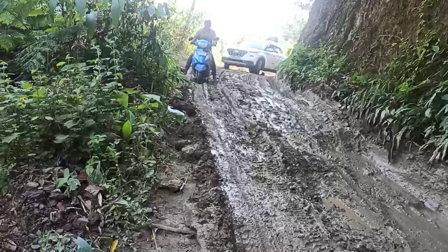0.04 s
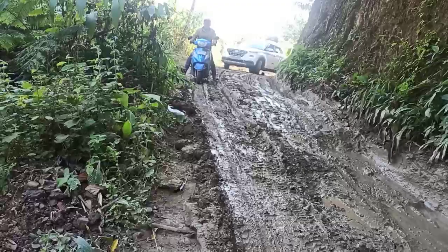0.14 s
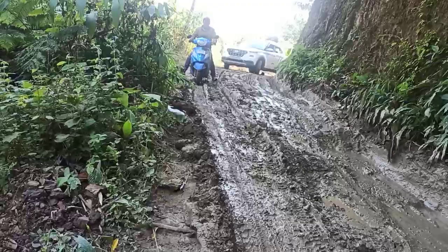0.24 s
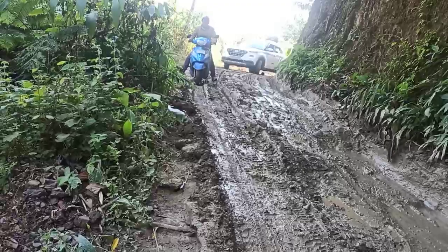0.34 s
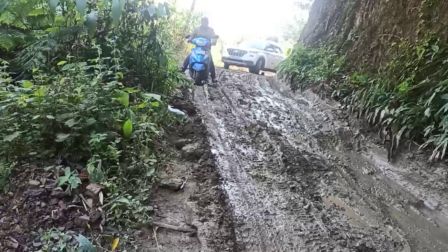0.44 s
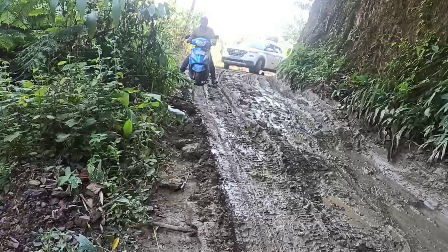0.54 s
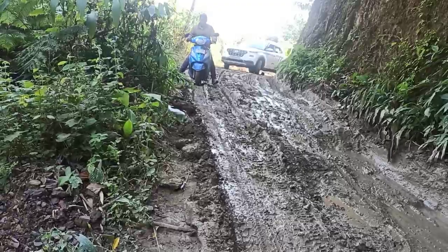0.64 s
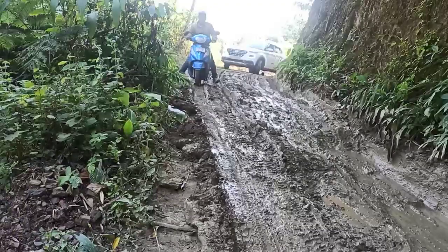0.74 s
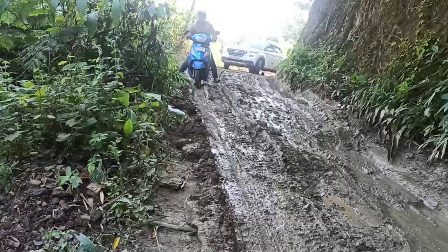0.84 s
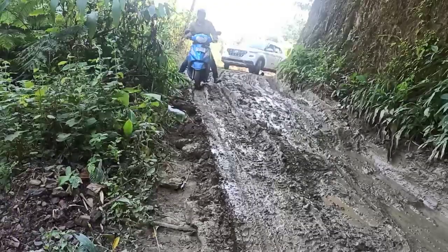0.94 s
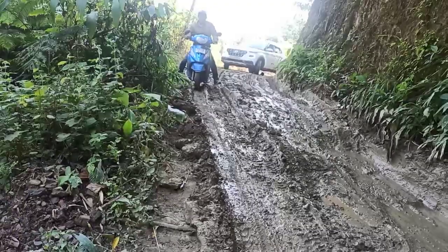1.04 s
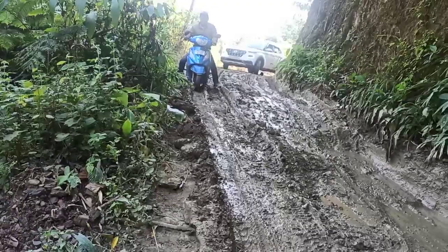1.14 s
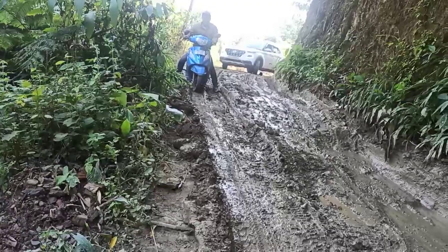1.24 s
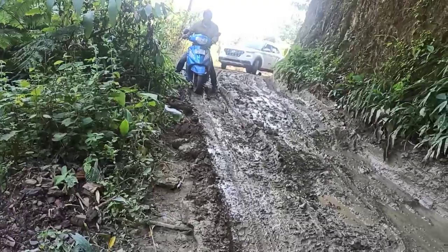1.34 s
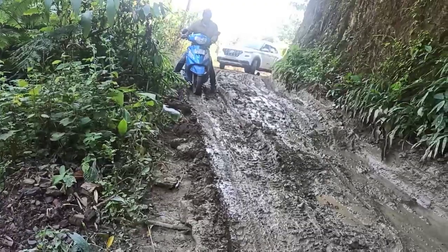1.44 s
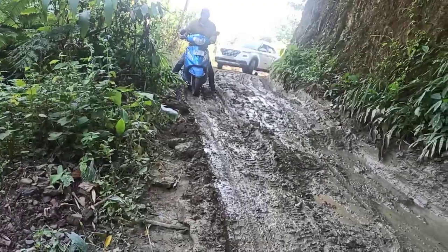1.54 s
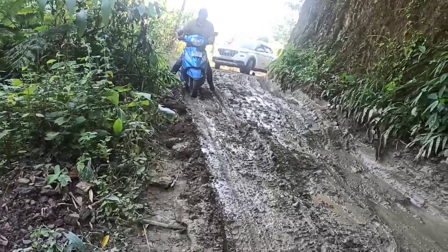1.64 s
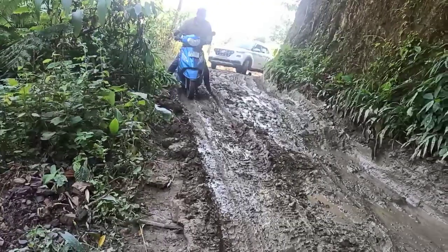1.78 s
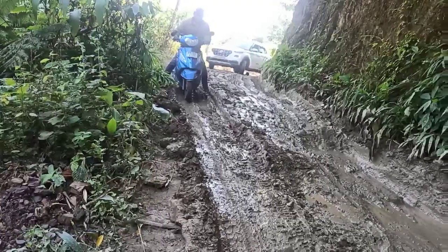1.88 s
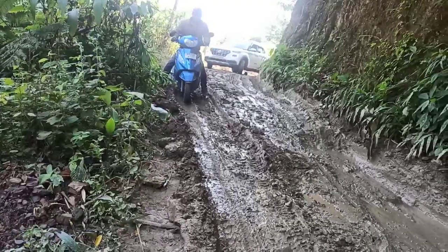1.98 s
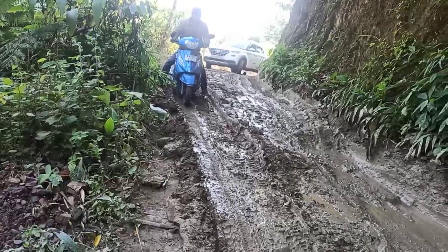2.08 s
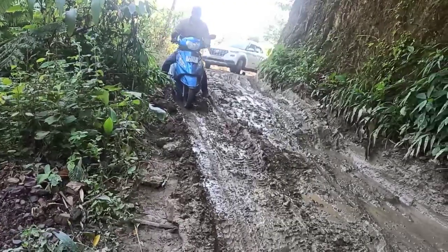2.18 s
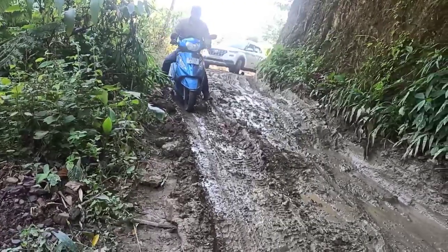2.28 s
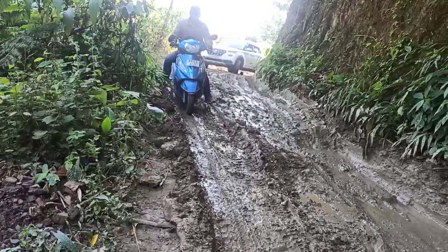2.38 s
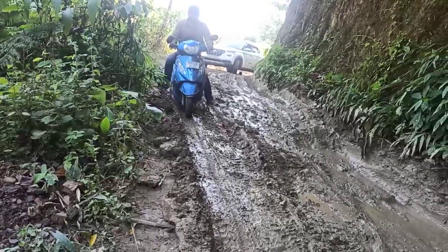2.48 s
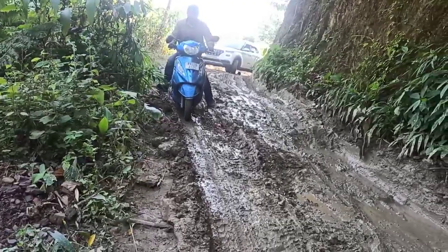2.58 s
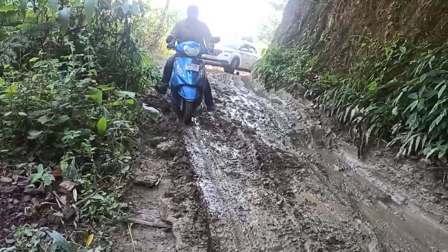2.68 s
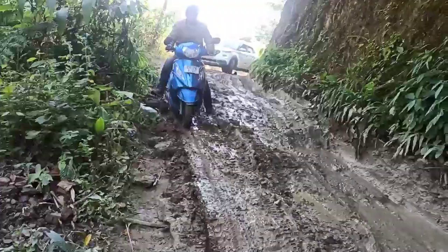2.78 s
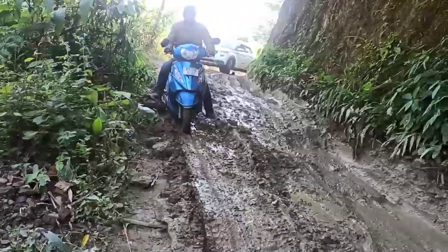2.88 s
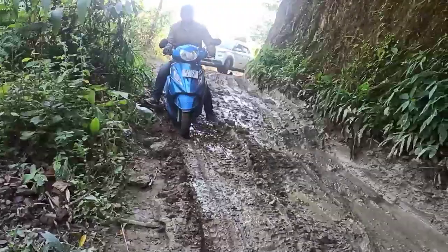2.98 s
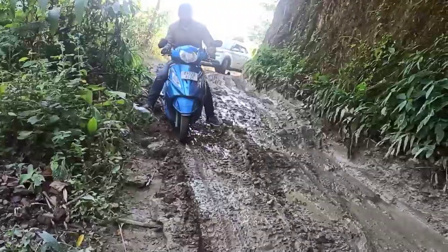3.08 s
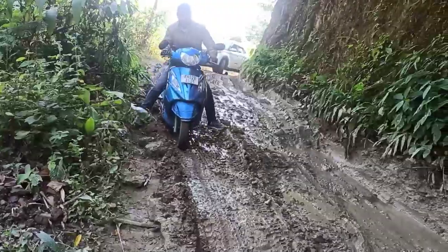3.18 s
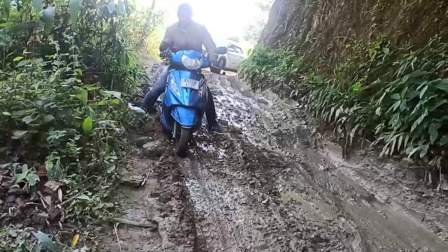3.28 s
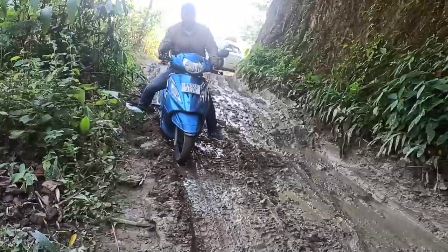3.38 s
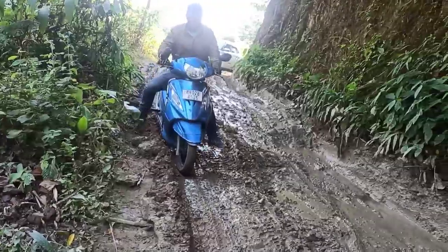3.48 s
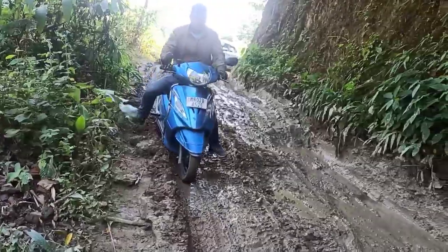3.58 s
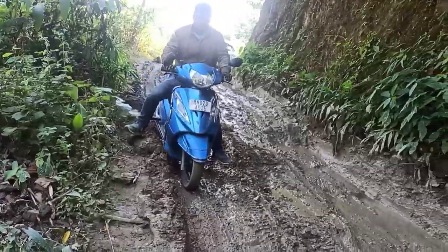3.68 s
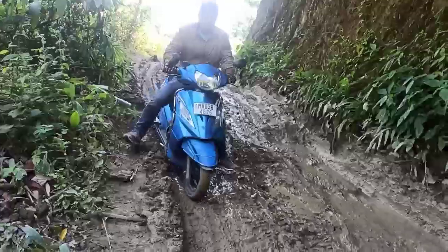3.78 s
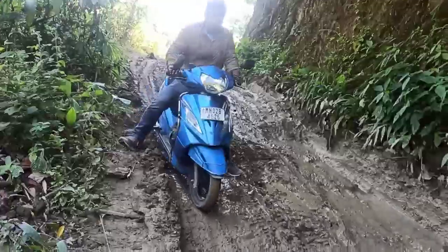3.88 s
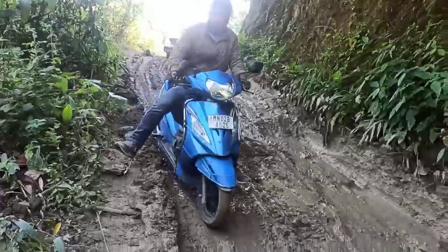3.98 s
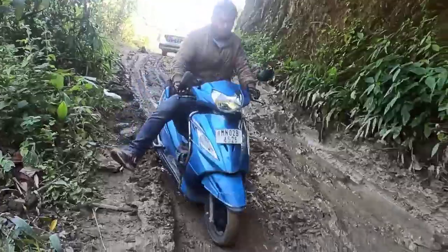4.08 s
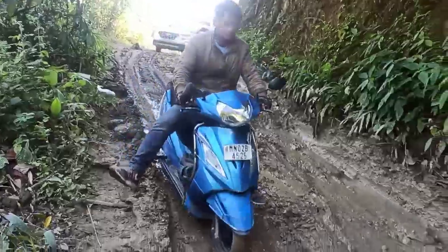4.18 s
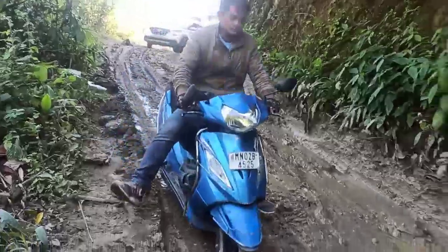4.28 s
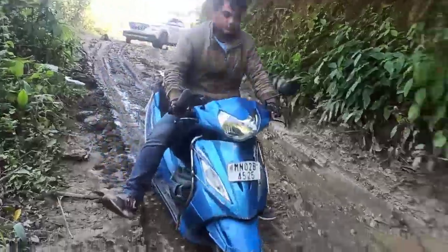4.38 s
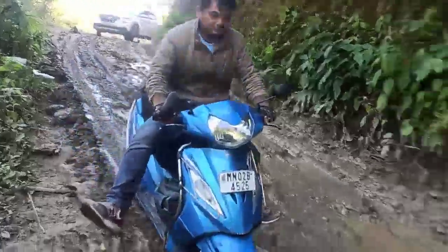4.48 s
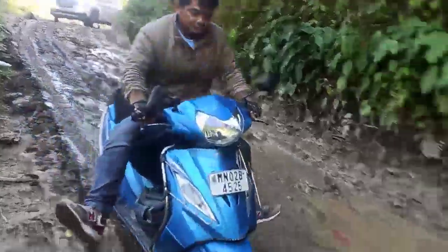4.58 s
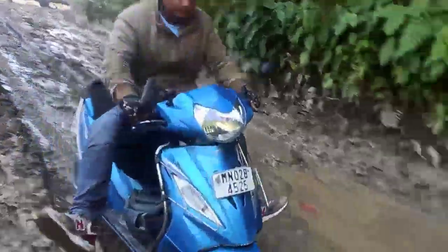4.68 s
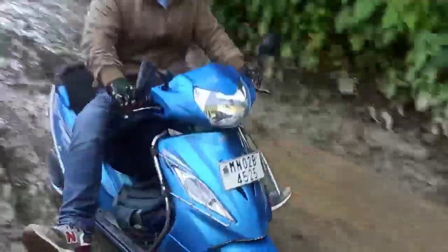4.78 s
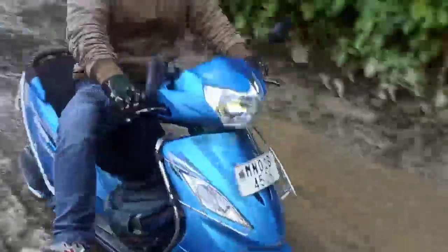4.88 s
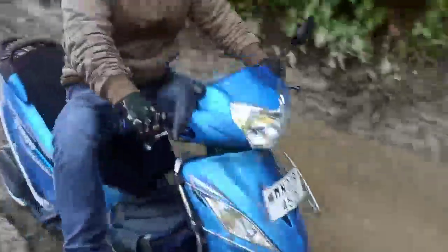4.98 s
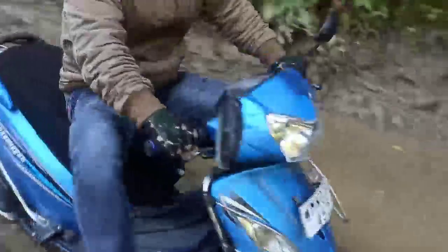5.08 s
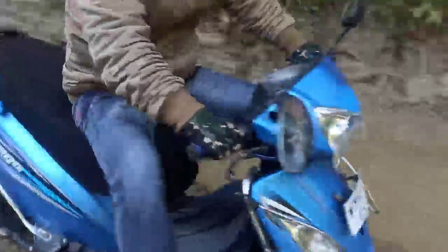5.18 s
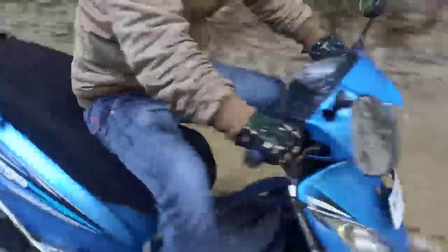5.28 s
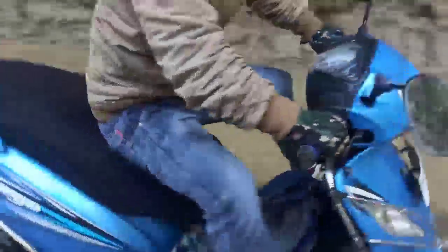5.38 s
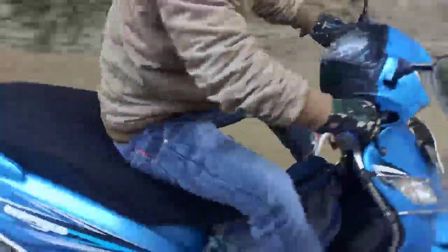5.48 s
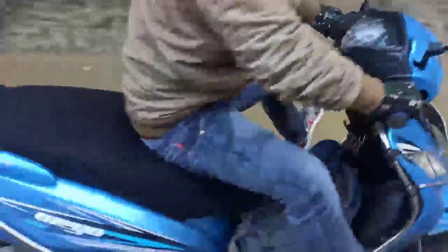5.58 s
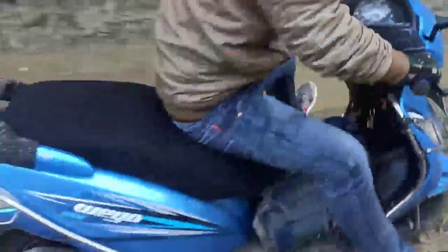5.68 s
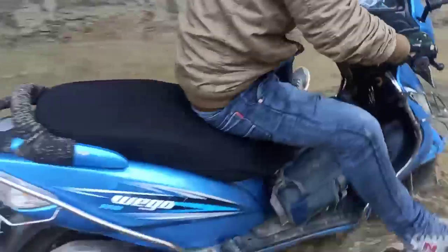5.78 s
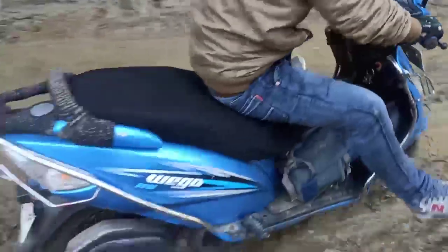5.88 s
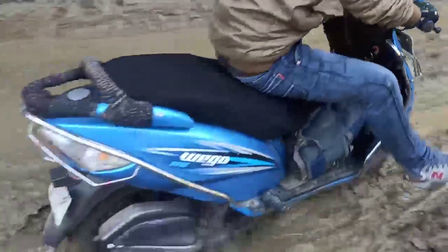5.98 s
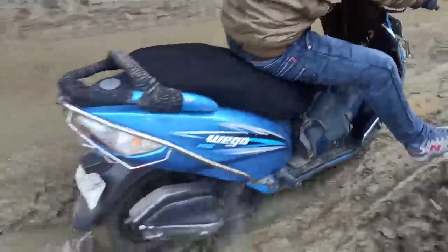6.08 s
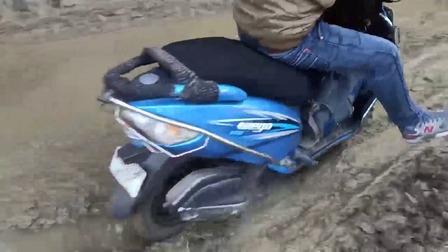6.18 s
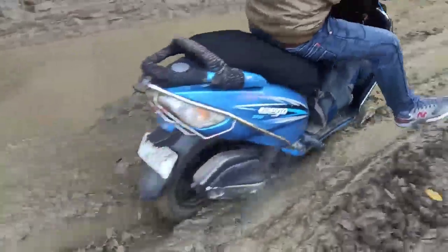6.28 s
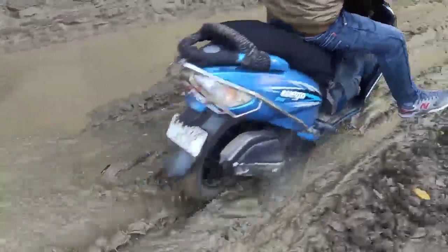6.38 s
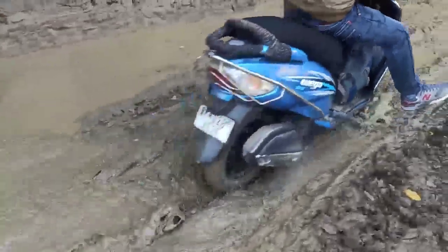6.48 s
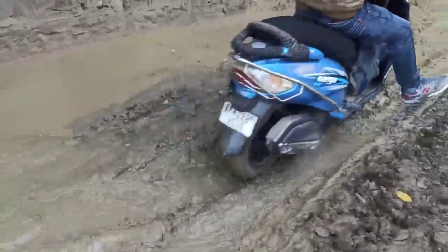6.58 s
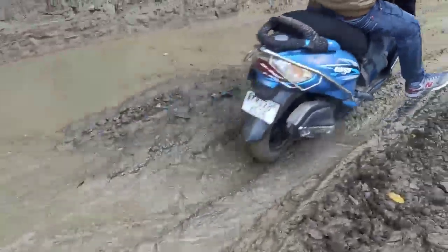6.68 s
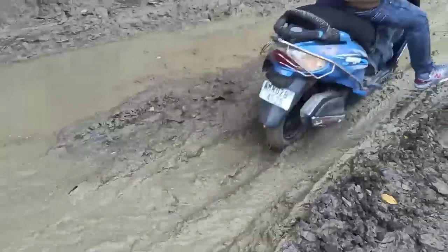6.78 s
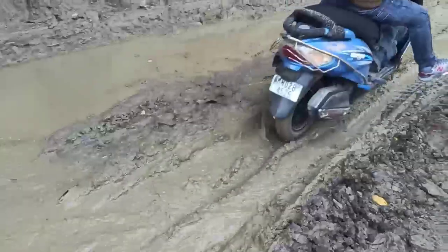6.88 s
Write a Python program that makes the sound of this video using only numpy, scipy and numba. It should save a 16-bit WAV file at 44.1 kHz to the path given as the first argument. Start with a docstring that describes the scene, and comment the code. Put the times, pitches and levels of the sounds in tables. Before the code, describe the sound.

A small scooter engine putters closer along a muddy track and passes close by, its tyres squelching and splattering through wet mud.

```python
"""A muddy forest track: a single-cylinder four-stroke scooter paddles slowly along, close past a phone.
Each firing excites the resonances of the silencer, and an earth bank reflects the thumps.
Belt, fan and valve gear give broadband noise and drive the modes of the engine case.
Tyres and boots tear wet mud, which hisses, squelches and splats; air pockets in it pop and suck shut."""
import sys
import numpy as np
from scipy import signal
from scipy.fft import rfft, irfft, next_fast_len
from scipy.io import wavfile
from scipy.ndimage import uniform_filter1d
from numba import njit

SR = 44100
rng = np.random.default_rng(int(sys.argv[2]) if len(sys.argv) > 2 else 0)


def unload_audio(sound):
    """Save the sound as a 16-bit wav file, at the path given as the first command line argument."""
    columns = np.transpose(np.atleast_2d(sound))
    # keep every value between -1 and 1, then stretch to whole-number steps
    steps = np.round(np.clip(columns, -1, 1) * 32767)
    wavfile.write(sys.argv[1], SR, steps.astype(np.int16))


N = 306054

# engine speed: time_s, firing_rate_hz
FIRING_RATE = [(0.0, 18.94), (0.091, 23.55), (0.687, 15.76), (0.965, 15.88), (1.337, 24.07), (1.913, 26.47),
               (2.414, 22.93), (2.742, 17.99), (3.166, 17.8), (3.782, 12.98), (3.885, 14.69),
               (4.208, 13.43), (4.737, 25.14), (5.059, 20.22), (5.356, 16.22), (5.704, 15.96),
               (6.033, 23.67), (6.567, 24.95), (6.722, 22.31), (6.94, 23.82)]
# twists of the throttle: opens_s, shuts_s, opening (0 to 1)
THROTTLE_TWISTS = [(-.3, .3, 0.39), (0.95, 2.31, 0.87), (3.045, 3.407, 0.45), (4.18, 4.774, 0.99),
                   (5.586, 7.2, 0.84)]
# silencer chambers (boom, purr, bark, rasp): pitch_hz, width_hz, shut_delay_ms, open_delay_ms
CHAMBER_MODES = [(94.2, 51, 4.76, 8.2), (142.9, 71.6, 3.25, 5.94), (210.5, 49, 6.3, 3.43),
                 (300.3, 47, 5.97, 3.55)]
# gain of the same chambers at the two ends of the throttle: shut_db, open_db
CHAMBER_GAINS = [(-3, -9), (-11, 1), (-6.5, -3.5), (-18.5, -15.5)]
# exhaust level, with extra gain for some chambers: time_s, level_db, boom_db, bark_and_rasp_db
EXHAUST_LEVELS = [(0, -44, 0, 4), (.33, -47, 3, 1), (.89, -46.5, -6, 0.5), (1.1, -38.5, -13, 1),
                  (1.35, -43.5, -6, 7), (1.6, -43, 3, 7), (1.95, -40.5, -4, 2.5), (2.03, -39, -4, 7.5),
                  (2.15, -41, -4, 8), (2.3, -41.5, 3, 7.5), (2.43, -37.5, 0, -5), (2.68, -41.5, -2.5, 2),
                  (2.9, -41.5, -2, 3), (3.25, -39, 1.5, 4.5), (3.4, -45, 9, 5), (3.47, -46.5, 1, 0),
                  (3.53, -36, -3, 0.5), (3.6, -45, 1, 2), (3.67, -40, -5, 1), (3.82, -44.5, 0, 7),
                  (3.98, -42.5, 1.5, 3), (4.12, -39.5, 0.5, 5), (4.27, -37, -2, 2), (4.4, -36, 3.5, 5.5),
                  (4.63, -30.5, 2, 3), (4.79, -33, 1, 4.5), (4.85, -27.5, 3.5, -2.5), (5.0, -27, -2, 1.5),
                  (5.11, -35, 6, -1.5), (5.17, -30.5, 2, -1), (5.22, -34, 2, 1), (5.28, -33.5, 3, 3.5),
                  (5.33, -37, 3, 3), (5.4, -34, -0.5, -2.5), (5.68, -25, -0.5, -3.5), (5.85, -28, 3, -4),
                  (5.96, -23, -5, -4), (6.12, -26, 2, -0.5), (6.25, -24.5, 3, 0), (6.6, -25, 5, -0.5),
                  (6.7, -27, 0, -0.5), (6.86, -25, 0.5, -1), (6.94, -26.5, -4, 1.5)]
# reflections from the earth bank: delay_s, gain_db
BANK_REFLECTIONS = [(.0075, -7.5), (.021, -17), (.034, -17)]

# drive level, with two parts relative to it: time_s, whirr_db, growl_db, whine_db
DRIVE_LEVELS = [(0, -49.5, -0.5, -4), (.17, -46.5, -0.5, -4), (.35, -48, 0.5, -10), (.9, -52, 3, -17),
                (1.1, -48, 2, -17), (1.5, -45.5, 0.5, -2), (1.9, -45.5, 6.5, -0.5),
                (2.24, -43.5, 2.5, -3.5), (2.55, -47, 4, -2.5), (3.23, -45, -1.5, -18),
                (3.55, -45.5, 4, -18), (3.9, -47, 4, -18), (4.22, -43, 0, -5), (4.33, -39, -1.5, -16),
                (4.45, -38, -6, -13), (4.6, -36.5, -4.5, -18), (4.75, -32.5, -7.5, -14),
                (4.88, -34, -1.5, -9), (5.1, -35, 0.5, -1), (5.3, -31.5, 1, -14), (5.5, -30.5, 1.5, -16),
                (5.7, -29, -0.5, -10), (5.85, -25.5, 2.5, -24), (6.01, -23.5, -2, -10),
                (6.15, -24.5, -6, -4), (6.3, -26.5, -7.5, -12), (6.5, -29, 0.5, 1), (6.62, -30, -1.5, -3),
                (6.75, -30.5, -5.5, -2.5), (6.85, -32, 1, -3), (6.94, -35.5, -4, -4)]
# noise spectra of the drive: frequency_hz, density_db
WHIRR_SPECTRUM = [(260, -32), (450, -0.5), (564, 1), (916, 3.5), (992, 0), (1100, 0.5), (1300, -1),
                  (1500, -0.5), (1950, -25), (3300, -120)]
GROWL_SPECTRUM = [(60, -14), (130, -5.5), (210, -4.5), (290, -1), (450, -2)]
# modes of engine case, belt drive, silencer shell and valve gear: pitch_hz, width_hz, level_db
CASE_MODES = [(518, 32, 6.5), (621, 21, 1), (686, 25, 3), (924, 48, 0.5), (1510, 110, -18.5)]
WHINE_MODES = [(1236, 18, 0.5), (1278, 20, 3), (1341, 16, 0.5), (1532, 34, -3), (1750, 26, -6), ]
SHELL_MODES = [(1141, 49, 0)]
VALVE_MODES = [(2096, 35, 4), (2530, 47, -4.5), (2946, 40, -4.5), (3080, 39, -3), (3760, 44, -4),
               (4530, 40, -5)]
# case ring as the scooter shows front, side and tail: time_s, over_whirr_db, tilt_db_per_octave
CASE_LEVELS = [(0, -9, 1), (.7, 0.5, -1), (1.8, -5.5, -11), (2.6, -4.5, -0.5), (3.2, -1.5, -6.5),
               (4.1, -2, 13), (4.6, -4.5, 14), (5.3, -7.5, -2), (5.9, -10, 9), (6.3, -6.5, 11.5),
               (6.94, -13, 9)]
# shell ring, strongest as the tail turns to the phone: time_s, over_whirr_db
SHELL_LEVELS = [(0, -13), (1.4, -14), (1.9, -6), (2.3, -5), (2.6, -16), (4.7, -10), (5.05, -7), (5.3, -19),
                (5.78, -9), (5.9, -15), (6.35, -16), (6.45, -3), (6.6, 2), (6.72, -5), (6.82, 1),
                (6.94, 5.5)]

# mud under the tyres, with two parts relative to the hiss: time_s, hiss_db, squelch_db, spray_db
MUD_LEVELS = [(0, -51.5, -4.5, -10), (.68, -48, -7, -9), (.9, -50.5, -6.5, -10), (1.3, -49.5, -0.5, -9),
              (2.3, -44.5, -2, -8), (2.76, -44, -4.5, -5), (3.15, -47, -4.5, -5), (3.56, -45.5, -2, -6.5),
              (3.7, -44, -10, -6), (3.85, -40.5, -11, -6), (4.05, -41, -6.5, -6), (4.5, -33.5, -5, -7),
              (4.9, -34, -2.5, -9), (5.1, -30.5, -14, -8), (5.45, -29.5, -0.5, -8.5),
              (5.58, -25.5, -4.5, -6.5), (5.68, -25.5, -3, -7), (5.79, -23.5, -4, -7),
              (5.88, -24, -1, -7.5), (6.0, -27.5, 0.5, -6.5), (6.25, -29, 2, -9), (6.5, -31.5, 2.5, -6.5),
              (6.7, -31.5, -2.5, -9.5), (6.94, -37, 3.5, -10.5)]
# noise spectrum of tearing mud: frequency_hz, density_db
HISS_SPECTRUM = [(2200, -22), (2900, -10.5), (3400, -5), (4400, -5), (4700, -5), (5000, -8), (5900, -8),
                 (6400, 0.5), (7000, -1), (7600, -1.5), (8600, -6)]
# boots and tread in deeper mud: start_s, over_hiss_db, power_decay_s, squelch_over_slosh_db
MUD_SLOSHES = [(.8, 6, 0.016, -13), (2.71, -1, 0.021, 3.5), (2.92, -0.5, 0.059, -17), (3.22, 3, 0.16, -7),
               (3.575, 5, 0.023, 4.5), (3.648, 1.5, 0.031, 4), (3.718, 11, 0.03, -3.5),
               (3.93, -9, 0.025, -1), (4.06, 2, .03, -5), (4.095, 12, 0.033, -8.5), (4.19, -4, 0.048, -5),
               (4.34, -4, 0.056, 4.5), (4.49, -12, 0.032, -11), (4.56, 5, 0.044, -3),
               (4.647, 8.5, 0.023, -3.5), (4.809, 6.5, 0.019, -3), (4.912, 6.5, 0.049, -3),
               (5.055, -4, 0.025, 3.5), (5.115, -1, 0.19, -1), (5.385, 1.5, 0.098, -14),
               (5.999, 8, 0.016, -3), (6.085, -2.5, 0.13, 3.5), (6.539, 1, 0.068, 5),
               (6.695, 4.5, 0.0068, 7)]
# mud landing: start_s, level_db, brightness_db, body_db, left_minus_right_db
MUD_SPLATS = [(0.3217, -45, 2, -10, 1), (2.5057, -35, -11, 3, -4), (2.6256, -37, -24, 4.5, -6),
              (2.7143, -34, -2, -12, -2), (2.737, -36, -20, -3, 0), (3.338, -34, -8, -5, 1),
              (3.578, -39, 8, 9, -3), (3.651, -40, 5, 4, -6), (3.682, -36, -12, 6, 0),
              (3.7183, -24, -1, -2.5, 4), (3.743, -30, -10, 4, -2), (3.814, -32, -20, -3, 7),
              (3.8828, -27, -31, -14, 0.5), (3.93, -28, -24, -12, 0), (3.9342, -19.5, -24, -14, 1),
              (4.0294, -20, -28, -14, 1), (4.101, -21, -19, -14, -1), (4.116, -21, -21, -8, -6),
              (4.1926, -24, -6, -6, -2), (4.306, -22, -29, -10, 5), (4.355, -20, -29, -18, -1),
              (4.401, -19, -27, -12, 0), (4.645, -17, -35, -11, 2), (4.778, -24, -42, -2, -4),
              (4.911, -12.5, -30, -12, -2), (5.06, -14, -23, -18, 2), (5.121, -15.5, -15, -18, -1),
              (5.328, -24, -14, -3, 4), (5.387, -19, -18, -16, -3), (5.502, -23, -25, 5, -7),
              (6.351, -18, -26, -4, -2), (6.543, -35, -16, -13, -2), (6.7014, -31, -34, -4, -2)]
# air pockets opening: start_s, level_db, pitch_hz
AIR_POCKETS = [(3.577, -40, 2180), (4.309, -34, 1070), (4.339, -27.5, 614), (4.354, -24, 1630),
               (4.418, -24.5, 730), (4.82, -24, 1130), (4.912, -19, 1500), (4.969, -24, 795),
               (5.327, -15.5, 806), (5.336, -20, 680), (5.329, -15, 1290), (5.357, -24.5, 850),
               (5.501, -19, 1460), (5.514, -18.5, 704), (5.79, -17, 1064), (5.829, -17, 1470),
               (6.069, -19, 820), (6.39, -20, 660)]
# hollows sucking shut: start_s, duration_s, level_db, from_hz, to_hz
MUD_HOLLOWS = [(6.016, 0.068, -25, 1500, 797)]

# stereo balance of drive and mud: time_s, left_minus_right_db
BALANCE = [(0.0, 2), (4.06, 1.5), (5.45, 1), (6.94, 2)]
# sound field at the two microphone ports: frequency_hz, unlike_share (0 to 1), left_minus_right_db
PORT_FIELD = [(25, .1, -6), (60, 0.2, -1), (250, 0.12, -2.5), (500, 0.03, -2), (1000, 0.57, -4.5),
              (1900, 0.73, -7.5), (3860, 1, 2.5), (6590, 1, -3.5), (8000, 1, 1), (13000, 0.98, -5)]
# phase difference between the ports: frequency_hz, left_lead_rad
PORT_PHASE = [(50, -0.2), (125, -0.1), (250, -0.16), (500, -0.53), (860, -0.61), (1800, -1.05),
              (3400, 0.32)]

START_CYCLE = .62  # share of an engine cycle done at time zero
OPEN_S, SHUT_S = 0.4, 0.12  # travel times of the throttle
# pairs: throttle shut, throttle open
FIRING_SCATTER_DB, CHAMBER_SCATTER_DB, CHAMBER_JITTER_MS = (1.9, .3), (1.6, .5), (.7, .1)
THUMP_DELAY_MS = 3.5, -1.5  # thumps come slightly later when shut, slightly earlier when open
CLATTER_DB = -15, -10.5  # over the whirr

RUMBLE_DB = -13  # over the whirr
SLOSH_RISE_S = .005
BASS_CUT_HZ, STOP_BAND_HZ, TOP_CUT_HZ = 64, (8650, 11550), 15700


def exhaust(cycles, opening):
    """Impulse excitation: each firing sends a pressure pulse that rings four silencer chambers."""
    fired = np.flatnonzero(np.diff(np.floor(cycles)))
    chance = rng.standard_normal((400, 9))[:len(fired)].T
    chamber_chance, timing_chance, firing_chance = chance[:4], chance[4:8], chance[8]
    strength = undb(between(FIRING_SCATTER_DB, opening[fired]) * firing_chance)
    strength /= np.sqrt(curves(FIRING_RATE)[0][fired])  # fewer, stronger thumps give the same power
    thump_delay_ms = between(THUMP_DELAY_MS, opening[fired])
    jitter_ms = between(CHAMBER_JITTER_MS, opening[fired]) * timing_chance
    scatter_db = between(CHAMBER_SCATTER_DB, opening[fired]) * chamber_chance
    level_db, boom_db, bark_db = curves(EXHAUST_LEVELS)
    extra_db = boom_db, 0, bark_db, bark_db
    out = 0
    for k, (open_hz, width_hz, *delay_ms) in enumerate(CHAMBER_MODES):
        late = ((thump_delay_ms + jitter_ms[k]) * SR / 1000).astype(int)
        ring = np.full(N, 1e-18)
        ring[np.clip(fired + late, 0, N - 1)] = strength * undb(scatter_db[k])
        hz = open_hz * (1 - 0.085 * (1 - opening))  # cooler gas at shut throttle lowers the pitch
        for widening in (1, 1.42, 2.0):
            ring = band(ring, hz, widening * width_hz)
        ring = delayed(unit(ring), between(delay_ms, opening) / 1000)
        gain = undb(between(CHAMBER_GAINS[k], opening) + extra_db[k])
        out = out - (-1) ** k * gain * ring  # neighbouring chambers have opposite polarity
    return out * undb(level_db)


def throttle():
    """Piecewise-linear control: each twist opens gradually and snaps shut; 0 shut, 1 open."""
    t, opening = np.arange(N) / SR, 0
    for opens_s, shuts_s, depth in THROTTLE_TWISTS:
        ramp = np.minimum((t - opens_s) / OPEN_S, 1 - (t - shuts_s) / SHUT_S)
        opening = opening + depth * np.clip(ramp, 0, 1)
    return np.clip(opening, 0, 1)


def drive(cycles, opening):
    """Forced vibration: belt, fan and valve gear make noise and excite the modes of case and shell."""
    whirr_db, growl_db, whine_db = curves(DRIVE_LEVELS)
    case_db, tilt_db = curves(CASE_LEVELS)
    firing_swell = 1 + 0.13 * np.exp(-(cycles % 1) / .3)
    force = firing_swell * grains(rate_hz=28., spread_db=1., tail_s=0.0068)
    rumble = undb(RUMBLE_DB) * band_noise([(20, 0), (60, -12)], 20, 60, 1., flicker_db=1.)
    growl = undb(growl_db) * band_noise(GROWL_SPECTRUM, 60, 450, 1., flicker_db=1.5)
    whirr = band_noise(WHIRR_SPECTRUM, 450, 1500, force, flicker_db=0.87)
    case = undb(case_db) * resonances(CASE_MODES, force, waver_db=3., tilt_db=tilt_db)
    whine = undb(whine_db) * resonances(WHINE_MODES, force, waver_db=1.4)
    shell = undb(curves(SHELL_LEVELS)[0]) * resonances(SHELL_MODES, force, waver_db=-0.2)
    clatter = undb(between(CLATTER_DB, opening)) * resonances(VALVE_MODES, force, waver_db=3.)
    return undb(whirr_db) * (whirr + rumble + growl + whine + case + shell + clatter)


def mud():
    """Amplitude-modulated noise: torn mud surges in three bands together, each with its own drops."""
    hiss_db, squelch_db, spray_db = curves(MUD_LEVELS)
    hiss_power, squelch_power = sloshes()
    surge = undb(0.53 * wander(18))
    squelch_spectrum = [(1250, -10), (1550, 1.5), (2500, -2), (3200, -8.5), (4200, -17.5)]
    drops = grains(rate_hz=50., spread_db=3.5, tail_s=0.004)
    squelch = band_noise(squelch_spectrum, 1250, 4200, surge * drops, flicker_db=1.32)
    droplets = grains(rate_hz=90., spread_db=3., tail_s=0.0028)
    hiss = band_noise(HISS_SPECTRUM, 2200, 8700, surge * droplets, flicker_db=0.87)
    mist = grains(rate_hz=40., spread_db=8., tail_s=0.0018)
    spray = band_noise([(11000, -1.1), (16000, 0.046)], 9200, 15540, surge * mist, flicker_db=0.5)
    treble = np.sqrt(1 + hiss_power) * (hiss + undb(spray_db) * spray)
    middle = np.sqrt(undb(2 * squelch_db) + squelch_power) * squelch
    return undb(hiss_db) * (treble + middle)


def sloshes():
    """Incoherent addition: sloshes sum in power in hiss and squelch, each rising fast and decaying."""
    t, hiss, squelch = np.arange(N) / SR, 0, 0
    for start_s, db, decay_s, squelch_db in MUD_SLOSHES:
        age = np.clip(t - start_s, 0, None)
        power = undb(2 * db) * (1 - np.exp(-age / SLOSH_RISE_S)) * np.exp(-age / decay_s)
        hiss, squelch = hiss + power, squelch + power * undb(2 * squelch_db)
    return hiss, squelch


def splats():
    """Impact noise: a brief contact has a broad spectrum, heard as a soft crack with a wet tail."""
    out, t = np.zeros((2, N + 4096)), np.arange(4096) / SR
    envelope = (1 - np.exp(-t / 0.00018)) * (np.exp(-t / 0.0015) + 0.18 * np.exp(-t / 0.031))
    for start_s, db, bright_db, body_db, pan_db in MUD_SPLATS:
        noise = rng.standard_normal((3, len(t))) * envelope
        bursts = noise[0] + 2.3 * noise[1:]  # one part shared, one for each side
        start = int(start_s * SR)
        for side, burst, gain in zip(out, bursts, undb(db) * pan(pan_db)):
            crack = 1.23 * band(band(burst, 6600., 2000.), 7400., 2600.)
            body = undb(body_db) * band(burst, 2200., 2200.)
            sheen = undb(bright_db) * band(burst, 13000., 5000.)
            side[start:start + len(t)] += gain * (crack + body + sheen)
    return out[:, :N]


def pops():
    """Cavity resonance: an air pocket rings as a damped oscillator, gliding up as it opens."""
    out, t = np.zeros(N + 2048), np.arange(2048) / SR
    for start_s, db, hz in AIR_POCKETS:
        envelope = np.exp(-t * hz / 5.6) * (1 - np.exp(-t / 0.00038))
        tone = np.sin(2 * np.pi * hz * t * (1 + 1.5 * t))
        start = int(start_s * SR)
        out[start:start + len(t)] += undb(db) * envelope * tone
    return out[:N] * pan(-3)


def sucks():
    """Gliding resonance: air rushes through a closing hollow; the pitch falls fast, then settles."""
    out, t = 0, np.arange(N) / SR
    for start_s, duration_s, db, from_hz, to_hz in MUD_HOLLOWS:
        done = np.clip((t - start_s) / duration_s, 0, 1)
        hz = to_hz + (from_hz - to_hz) * (1 - done) ** 2
        tone = np.sin(2 * np.pi * np.cumsum(hz) / SR) * undb(3. * wander(90))
        envelope = np.sqrt(np.sin(np.pi * done) + 1e-12) * (done < 1) * (done > 0)
        out = out + undb(db) * envelope * tone
    return out * pan(-5)


def bank_echo(direct):
    """Early reflection: the earth bank returns delayed, weaker copies of the sound."""
    return sum(undb(db) * delayed(direct, delay_s) for delay_s, db in BANK_REFLECTIONS)


def resonances(modes, force, waver_db, tilt_db=0.):
    """Modal superposition: noise-driven modes waver separately; rms 1 before the tilt about 700 Hz."""
    plain, tilted = 0, 0
    for hz, width_hz, db in modes:
        gain = undb(db + waver_db * wander(5.01)) / np.sqrt(width_hz)
        alike, unlike = (band(force * rng.standard_normal(N), hz, width_hz) for _ in range(2))
        ring = gain * ports(alike, unlike, hz)
        plain = plain + ring
        tilted = tilted + undb(tilt_db * np.log2(hz / 700)) * ring
    return tilted / np.sqrt(np.mean(plain ** 2))


def band_noise(spectrum, low_hz, high_hz, envelope, flicker_db):
    """Spectral shaping: noise in third-octave bands, each flickering independently; rms 1."""
    size = next_fast_len(N)
    hz, out = np.fft.rfftfreq(size, 1 / SR), 0
    shaped = rfft(envelope * rng.standard_normal((2, N)), size) * undb(at_hz(spectrum, hz + 1)[0])
    for edge_hz in low_hz * 2 ** np.arange(0, np.log2(high_hz / low_hz) - .01, 1 / 3):
        inside = (hz >= edge_hz) & (hz < min(high_hz, edge_hz * 2 ** (1 / 3)))
        alike, unlike = irfft(shaped * inside, size)[:, :N]
        out = out + undb(flicker_db * wander(14)) * ports(alike, unlike, edge_hz)
    return unit(out)


def grains(rate_hz, spread_db, tail_s):
    """Shot process: an envelope whose power is raised by random kicks that decay exponentially."""
    kicks = (rng.random(N) < rate_hz / SR) * undb(spread_db * rng.random(N))
    return np.sqrt(1 + signal.lfilter([1], [1, -np.exp(-1 / (tail_s * SR))], kicks ** 2))


def wander(rate_hz):
    """Low-pass random modulation: held random values, smoothed twice; spread near 1."""
    hold = int(SR / rate_hz)
    steps = np.repeat(rng.standard_normal(N // hold + 1), hold)
    return 1.6 * uniform_filter1d(uniform_filter1d(steps, hold), hold)[:N]


def ports(alike, unlike, hz):
    """Partial coherence: the two microphone ports share the bass but differ in the treble."""
    share, pan_db = at_hz(PORT_FIELD, hz)
    return (alike + share * unlike * np.array([[1], [-1]])) / np.sqrt(1 + share ** 2) * pan(pan_db)


def band(x, hz, width_hz):
    """Second-order resonance with constant or moving centre and width; gain 1 at the centre."""
    return state_variable(x, hz + np.zeros(len(x)), width_hz + np.zeros(len(x)))


@njit
def state_variable(x, hz, width_hz):
    """Two integrators in a feedback loop form a damped oscillator, used as a band-pass."""
    y, band_state, low_state = np.empty(len(x)), 0., 0.
    for i in range(len(x)):
        g, damping = np.pi * hz[i] / SR, width_hz[i] / hz[i]
        g += g ** 3 / 3 + 2 * g ** 5 / 15  # series for tan(g)
        velocity = (band_state + g * (x[i] - low_state)) / (1 + g * (g + damping))
        band_state = 2 * velocity - band_state
        low_state += 2 * g * velocity
        y[i] = damping * velocity
    return y


def delayed(x, delay_s):
    """Constant or moving delay by linear interpolation."""
    i = np.arange(N)
    return np.interp(i - delay_s * SR, i, x)


def pan(left_minus_right_db):
    """Level difference as a left and a right gain."""
    return undb(np.vstack([left_minus_right_db, -left_minus_right_db]) / 2)


def curves(table):
    """Columns of a table interpolated in time, one value a sample."""
    time_s, *columns = np.transpose(table)
    return [np.interp(np.arange(N) / SR, time_s, column) for column in columns]


def at_hz(table, hz):
    """Columns of a table interpolated in log frequency."""
    table_hz, *columns = np.transpose(table)
    return [np.interp(np.log(hz), np.log(table_hz), column) for column in columns]


def between(pair, share):
    """Linear interpolation from the first value to the second."""
    return pair[0] + (pair[1] - pair[0]) * share


def undb(db):
    """Decibels to amplitude ratio."""
    return 10 ** (np.asarray(db) / 20)


def unit(x):
    """Normalisation to rms 1."""
    return x / np.sqrt(np.mean(x ** 2))


def scene():
    """Superposition: exhaust, drive and mud add as pressures in two channels."""
    cycles = START_CYCLE + np.cumsum(curves(FIRING_RATE)[0]) / SR
    opening = throttle()
    drive_and_mud = (drive(cycles, opening) + mud() + pops() + sucks()) * pan(curves(BALANCE)[0])
    thumps = exhaust(cycles, opening)
    return (thumps + bank_echo(thumps)) * pan(-.5) + drive_and_mud + splats()


def record(dry):
    """Linear filtering: left and right differ in phase; deep bass, a treble band and the top are cut."""
    size = next_fast_len(N)
    lead_rad = at_hz(PORT_PHASE, np.fft.rfftfreq(size, 1 / SR) + 1)[0]
    paired = irfft(rfft(dry, size) * np.exp(.5j * np.array([lead_rad, -lead_rad])), size)[:, :N]
    bass = signal.butter(3, BASS_CUT_HZ, "high", fs=SR, output="sos")
    gap = signal.ellip(7, .3, 42, STOP_BAND_HZ, "bandstop", fs=SR, output="sos")
    top = signal.ellip(12, .2, 80, TOP_CUT_HZ, fs=SR, output="sos")
    return signal.sosfilt(np.vstack([bass, gap, top]), paired)


dry = scene()
out = record(dry)
unload_audio(out)
```